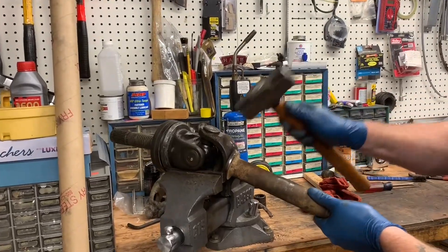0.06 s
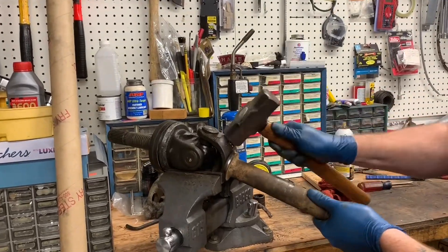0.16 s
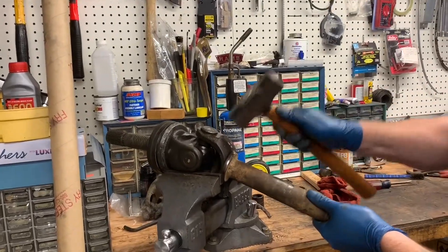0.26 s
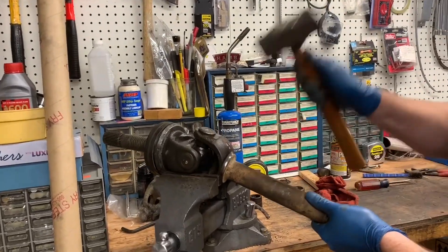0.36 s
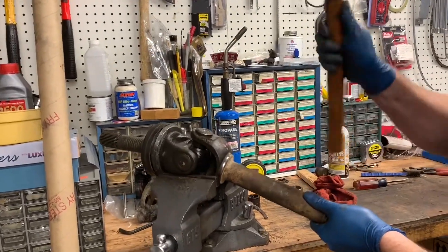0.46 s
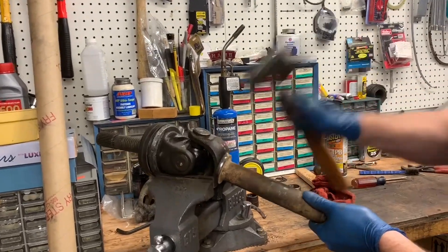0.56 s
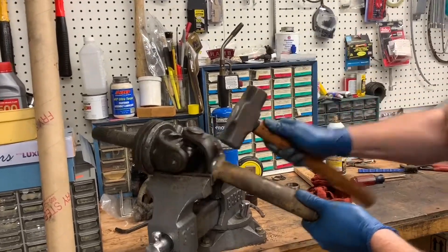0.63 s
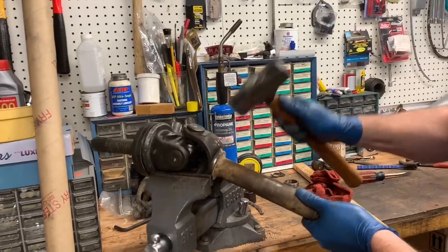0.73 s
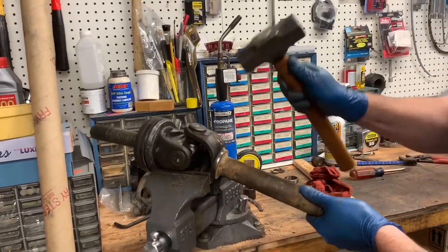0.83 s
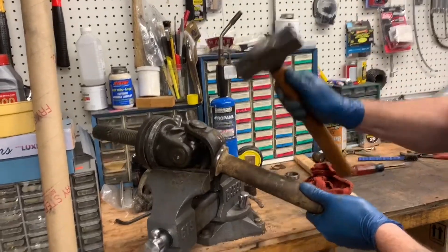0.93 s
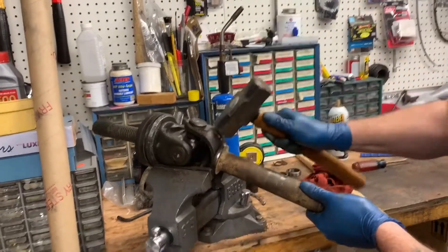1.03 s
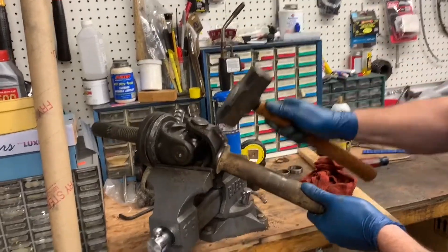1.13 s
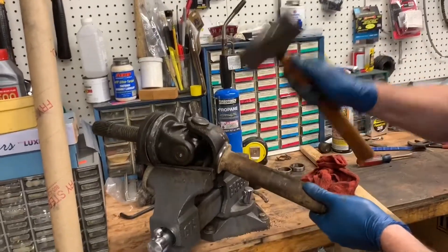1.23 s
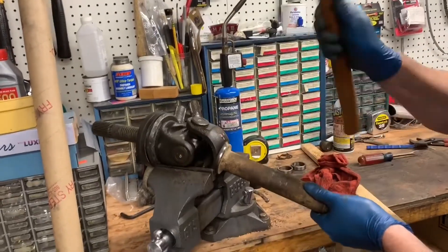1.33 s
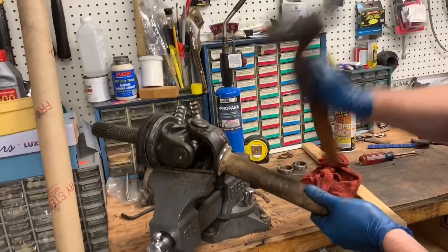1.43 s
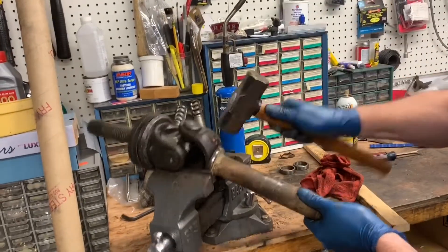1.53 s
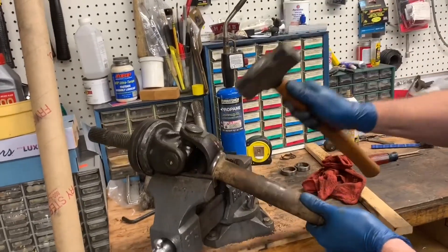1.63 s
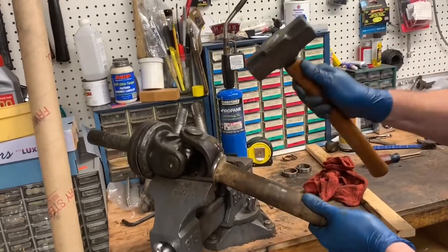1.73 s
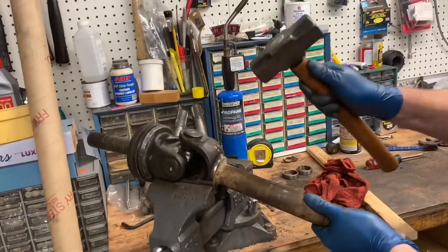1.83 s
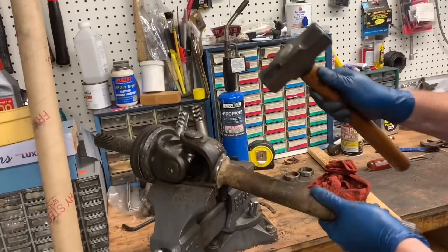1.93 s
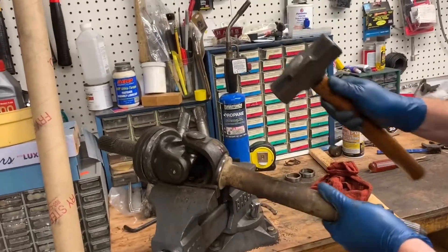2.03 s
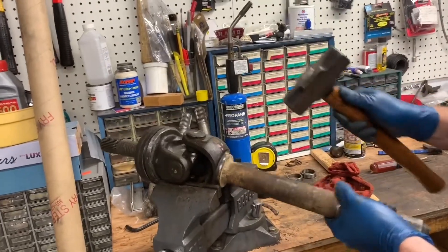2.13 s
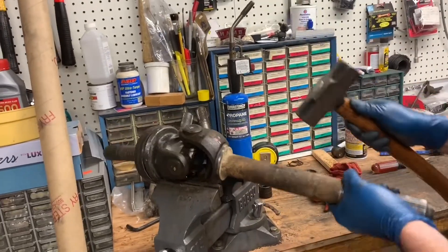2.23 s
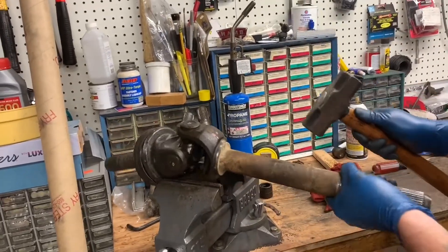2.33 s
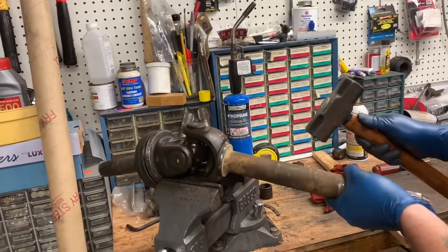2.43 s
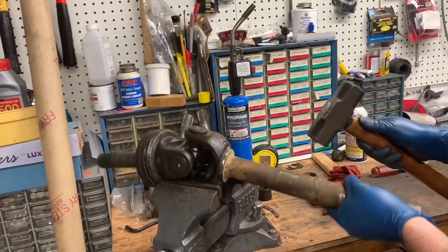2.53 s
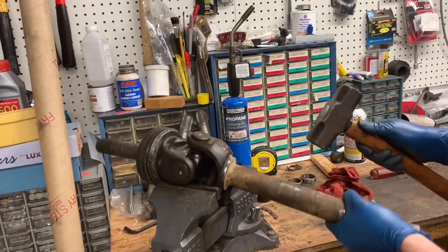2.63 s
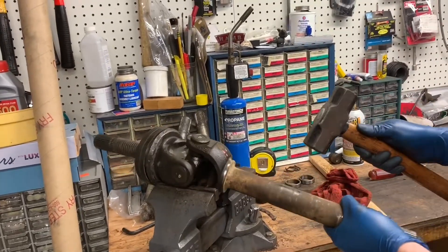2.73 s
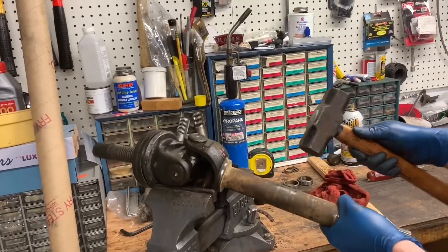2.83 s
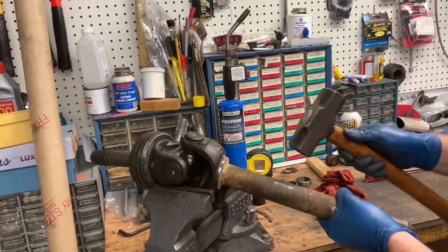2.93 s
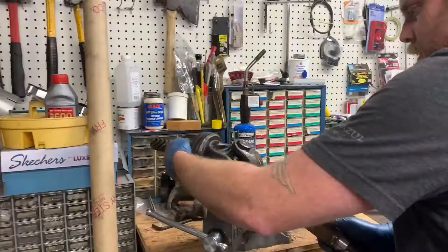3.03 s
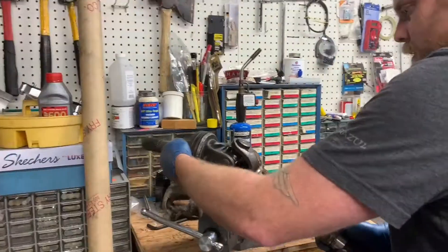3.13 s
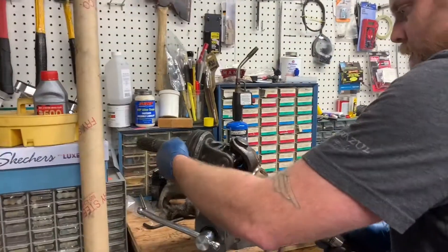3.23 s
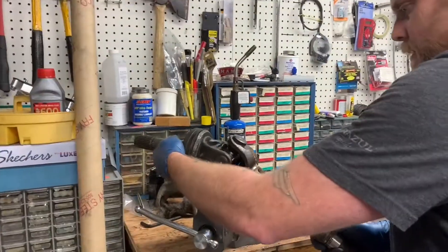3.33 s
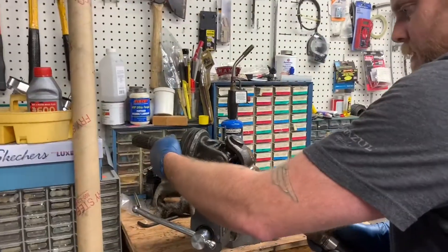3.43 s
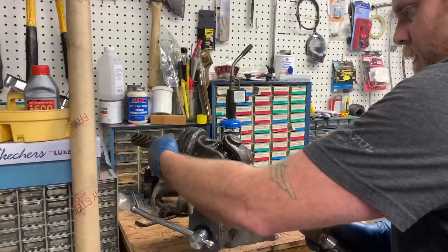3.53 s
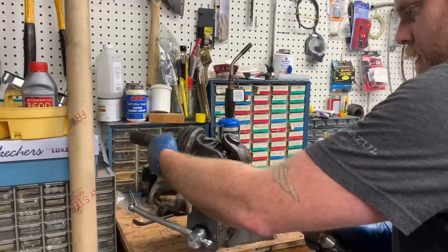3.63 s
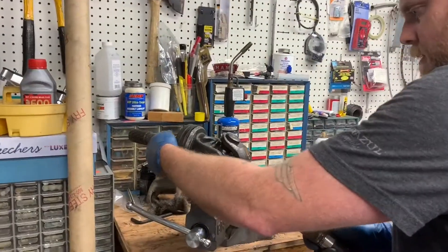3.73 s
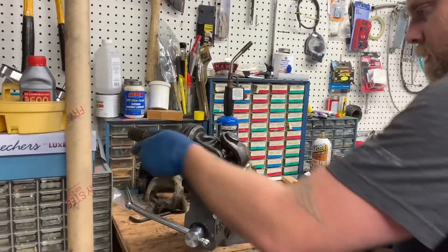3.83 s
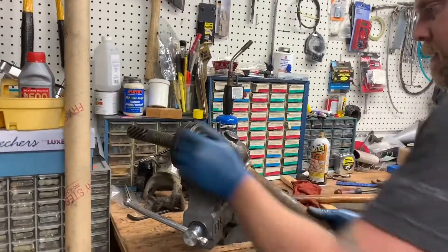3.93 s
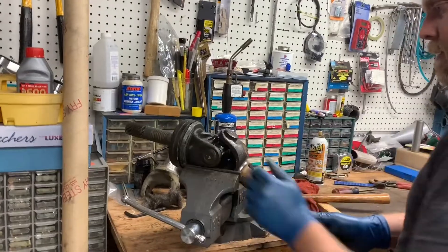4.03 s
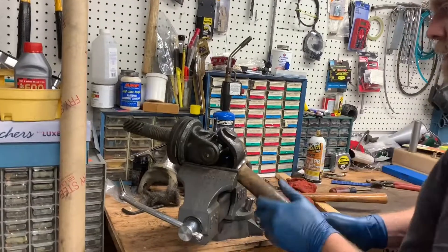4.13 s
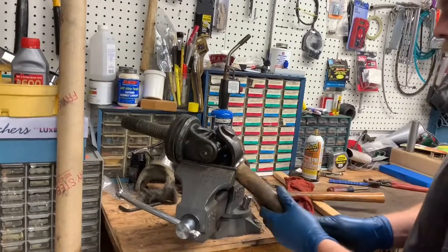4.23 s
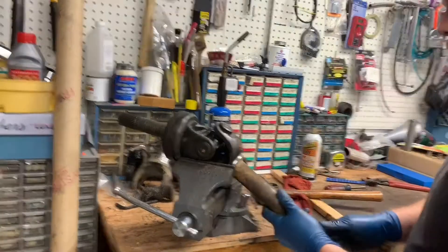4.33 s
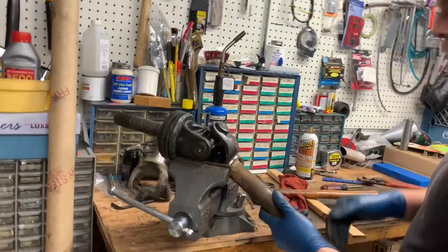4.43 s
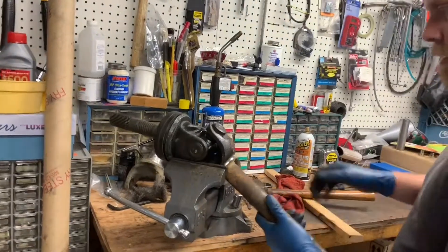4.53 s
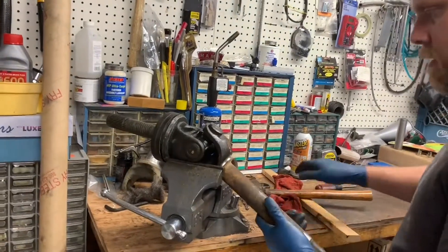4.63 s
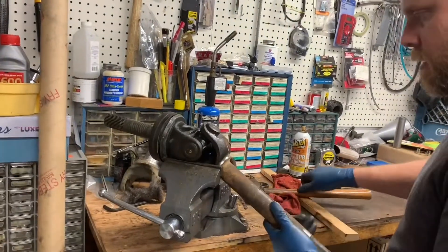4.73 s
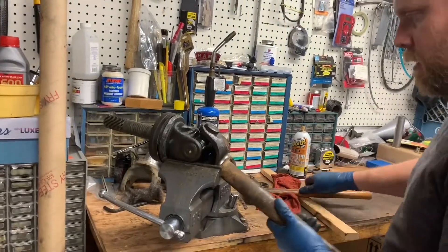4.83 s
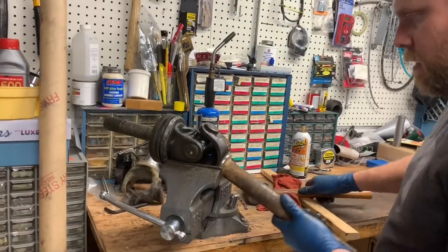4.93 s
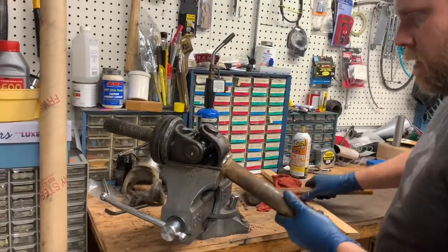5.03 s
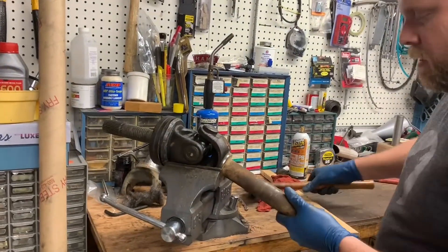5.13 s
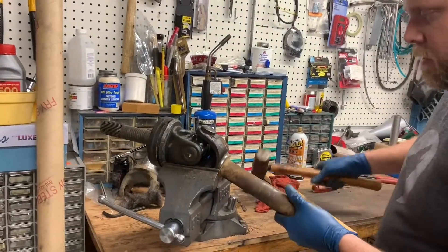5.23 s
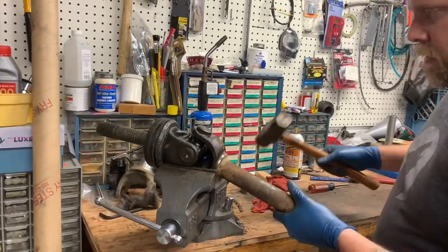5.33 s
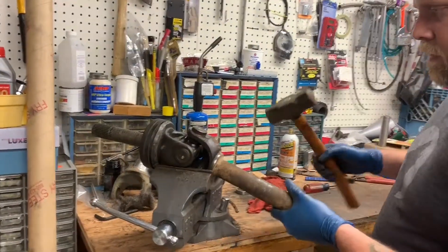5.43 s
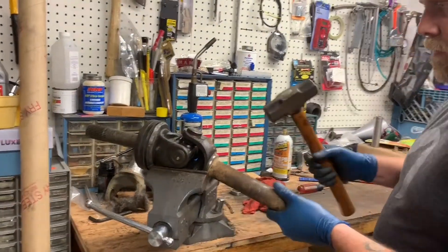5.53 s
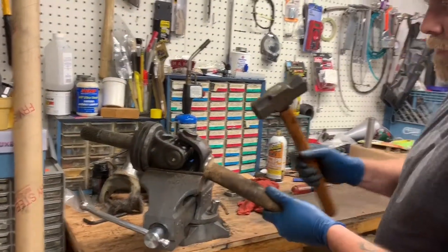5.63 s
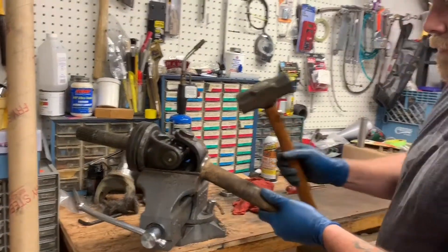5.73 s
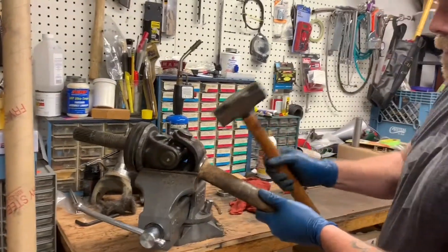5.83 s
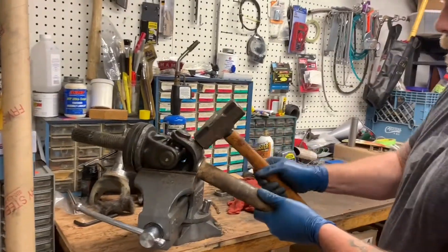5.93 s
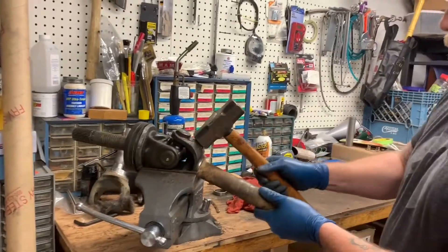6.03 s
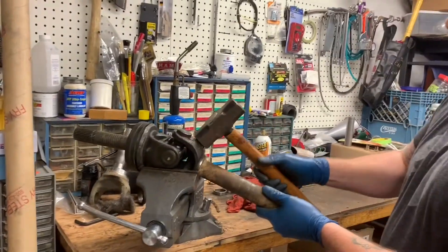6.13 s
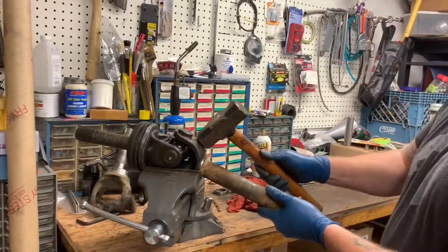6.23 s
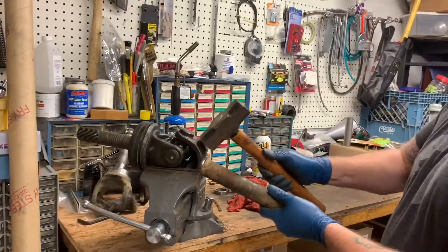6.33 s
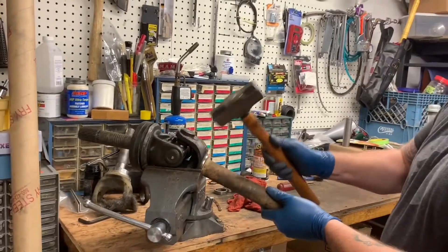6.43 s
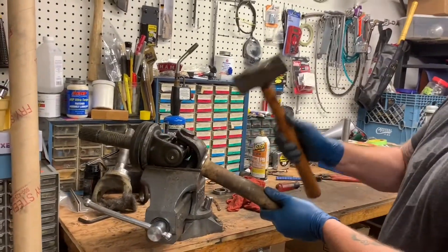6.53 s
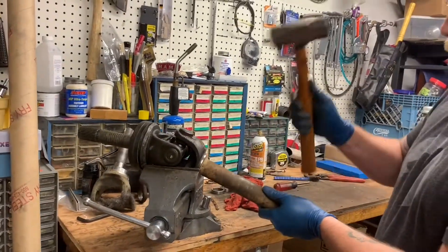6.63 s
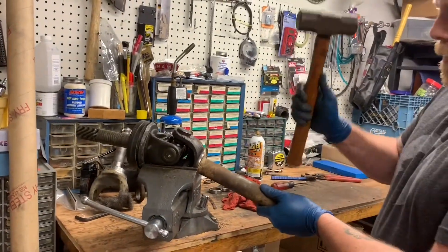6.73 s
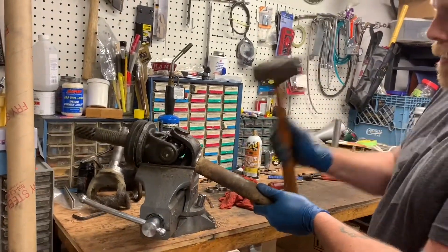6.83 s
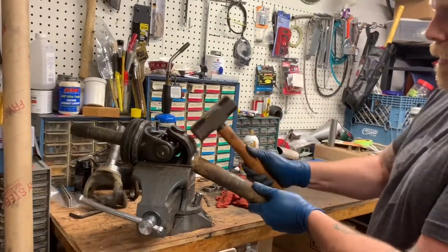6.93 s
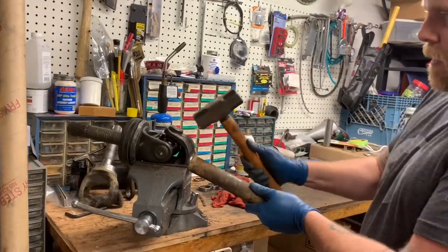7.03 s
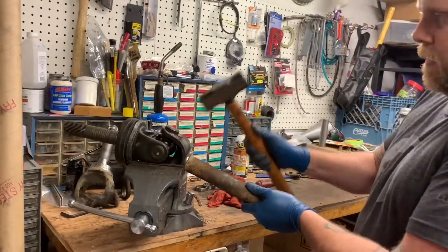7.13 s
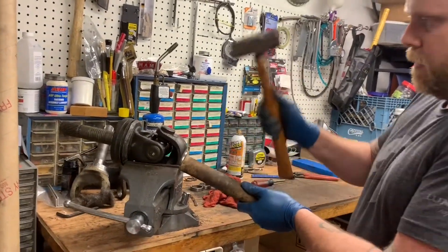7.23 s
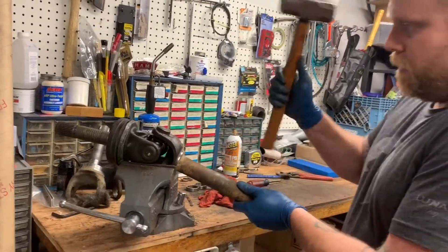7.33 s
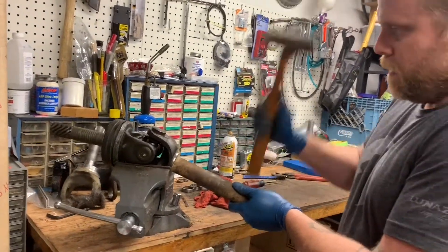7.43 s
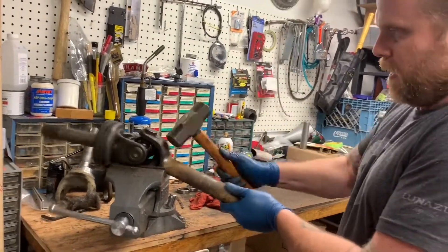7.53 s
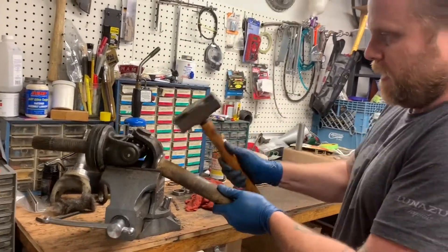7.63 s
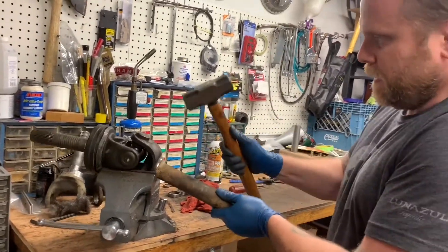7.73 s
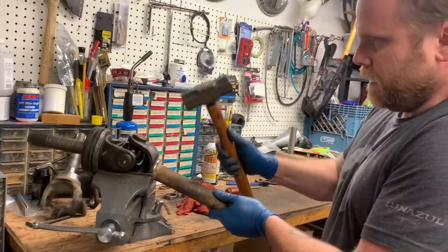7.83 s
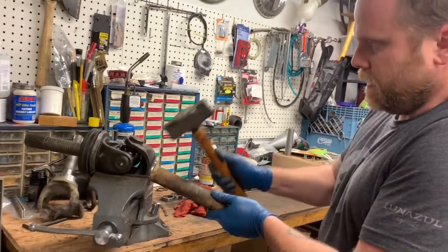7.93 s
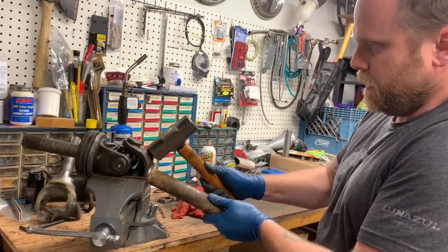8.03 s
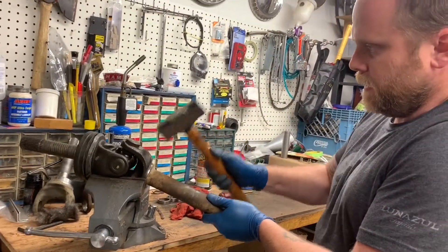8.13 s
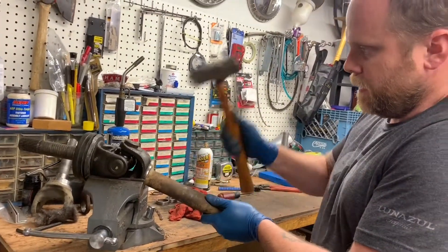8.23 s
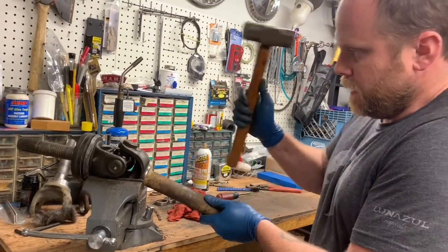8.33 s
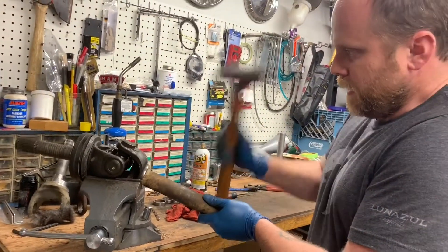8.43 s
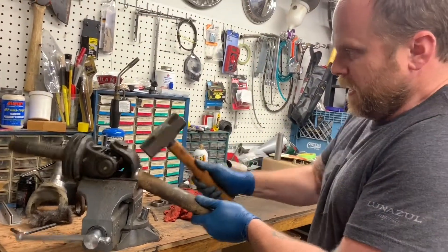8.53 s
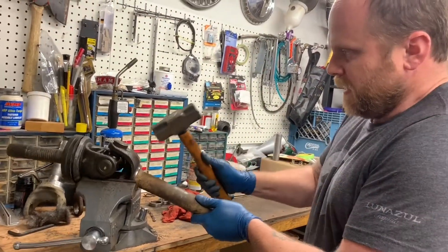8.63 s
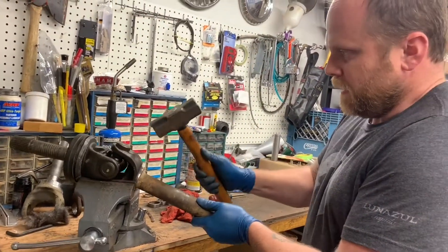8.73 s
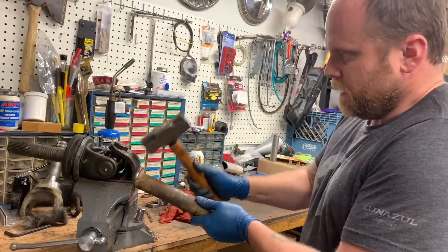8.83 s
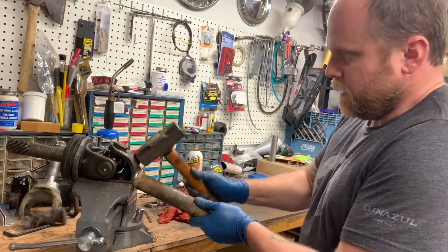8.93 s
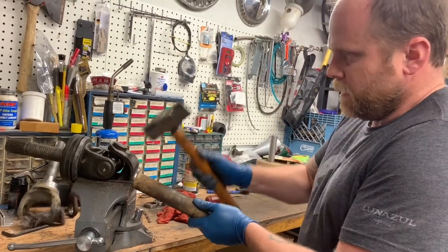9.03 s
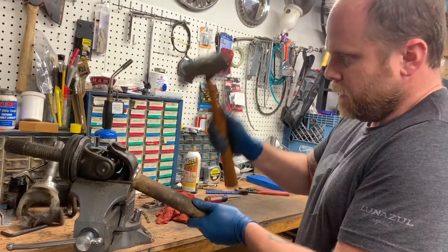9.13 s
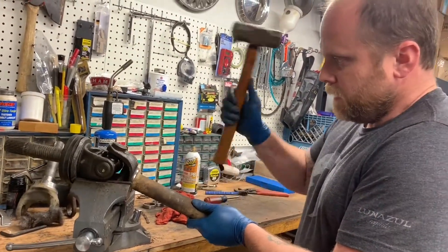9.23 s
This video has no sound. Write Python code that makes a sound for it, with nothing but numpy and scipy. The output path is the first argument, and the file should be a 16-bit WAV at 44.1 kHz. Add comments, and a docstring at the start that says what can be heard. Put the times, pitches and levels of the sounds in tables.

```python
"""A small sledgehammer beats on the joint of a steel axle shaft clamped in a bench vise, in a small workshop.
Each blow is a decaying noise burst with damped modes of vise, shaft, hammer head, tube and wooden bench.
Loose parts answer: a bearing cap chinks as damped modes, and small things rattle as swelling noise.
Between two rounds the hammer is put down, a gloved hand slides along the shaft (modulated noise),
and the joint is turned over with clacks, creaks and ticks, above low room noise with dull scuffs."""
import sys
import numpy as np
from scipy import signal
from scipy.fft import rfft, irfft
from scipy.io import wavfile
from scipy.ndimage import uniform_filter1d

SR = 44100
rng = np.random.default_rng(int(sys.argv[2]) if len(sys.argv) > 2 else 0)


def store_pcm(level_fs):
    """Save levels as 16-bit WAV."""
    pcm = np.round(np.clip(level_fs, -1, 1) * 32767).astype(np.int16)
    wavfile.write(sys.argv[1], SR, np.atleast_2d(pcm).T)


N = 408807
AGE = np.arange(SR) / SR  # time since a hit [s]


def amp(db):
    """Level: 20 dB is a factor of ten in amplitude."""
    return 10 ** (np.asarray(db) / 20)


def evened(x):
    """Normalization: scales a signal to unit root mean square."""
    return x / np.sqrt(np.mean(x ** 2) + 1e-20)


def read(points, hz, axis=1):
    """Logarithmic interpolation: reads a column of a spectrum table at the given frequencies."""
    table = np.array(points, float)
    return np.interp(np.log(hz + 1), np.log(table[:, 0] + 1), table[:, axis])


def panned(db):
    """Level difference: half is added on the left and half taken off on the right."""
    return amp(np.array([[.5], [-.5]]) * db)


def add(mix, s, sound):
    """Superposition: mixes a sound in at time s; whatever falls outside the scene is dropped."""
    start = round(s * SR)
    sound = sound[:, max(-start, 0):]
    part = mix[:, max(start, 0):][:, :sound.shape[1]]
    part += sound[:, :part.shape[1]]


def drift(size, hz):
    """Random modulation: low-passed noise of unit size, separate for each microphone."""
    f = np.fft.rfftfreq(size, 1 / SR)
    lowpass = 1 / (1 + (f / hz) ** 2) ** 2
    return evened(irfft(rfft(rng.standard_normal((2, size))) * lowpass, size))


def swell(t, width):
    """Smooth envelope: a rise and fall around t = 0."""
    return 1 / (1 + (t / width) ** 2 / 2) ** 2


def crowd(spectrum, ripple_db=5.0, spacing_hz=45):
    """Modal overlap: many crowded resonances leave peaks and notches all over a spectrum."""
    hz = np.arange(0, SR / 2, 8.)
    lag = np.fft.rfftfreq(len(hz), 8.)
    smoothing = np.exp(-(lag * spacing_hz) ** 2)
    ripple = evened(irfft(rfft(rng.standard_normal(len(hz))) * smoothing, len(hz)))
    ripple = ripple * hz / (hz + 500)  # weaker in the bass
    return np.c_[hz, read(spectrum, hz) + ripple_db * ripple]


# coherence of the two microphones: (frequency [Hz], left-right likeness [1])
ALIKE = [(60, 0.94), (150, 0.86), (300, 0.86), (600, 0.49), (1300, 0.36), (3000, 0.15), (8000, 0.034),
         (12000, 0.45)]
# stereo balance: (frequency [Hz], left-right level difference [dB])
LEAN = [(60, 1.5), (500, 1), (1100, 2.5), (2200, 2), (4500, -2), (9000, 0), (15000, 1)]


def noise(spectrum, size, tilt_db=0):
    """Partial coherence: coloured noise at two microphones, most alike in the bass."""
    hz = np.fft.rfftfreq(size, 1 / SR)
    a, b = rfft(rng.standard_normal((2, size)))
    same = np.clip(read(ALIKE, hz), -1, 1)
    pair = np.array([a, same * a + np.sqrt(1 - same ** 2) * b])
    tilt = tilt_db * np.log2(hz / 1000 + 0.18)
    colour = amp(read(spectrum, hz) + tilt) * panned(read(LEAN, hz))
    return evened(irfft(colour * pair, size))


# decay of a hit: (frequency [Hz], crack over the body per unit of crack [factor],
# early t60 at damping 1 [s], late level before the common gain [dB], late t60 [s])
DECAY = [(60, .1, 0.82, -29, 2.2), (170, 0.41, 0.37, -27, 1.8), (400, 0.2, 0.32, -25.5, 1.1),
         (1200, 0.92, 0.23, -22.5, 0.79), (3070, 0.75, .27, -22.5, 0.67), (7540, 1, 0.26, -30.5, 1),
         (14900, 3.7, 0.3, -38.5, 0.38)]


def burst(spectrum, rise, tilt_db, damping=1.0, crack=1., crack_s=0.016, build_cycles=0.61, bounce_db=3.5):
    """Two-stage decay: a crack of tiny bounces, crowded modes dying fast, then the room's tail."""
    z, hz = rfft(noise(spectrum, SR, tilt_db)), np.fft.rfftfreq(SR, 1 / SR)
    centres, out = np.log([row[0] for row in DECAY]), np.zeros((2, SR))
    contact = crack * np.exp(-(AGE / crack_s) ** 4) * amp(bounce_db * drift(SR, 570)[0])
    for (f, over, early, late_db, late), pick in zip(DECAY, np.eye(len(DECAY))):
        band = irfft(z * np.interp(np.log(hz + 1), centres, pick), SR)
        body = amp(-60 * AGE * damping / early) * (1 + over * contact)
        tail = amp(late_db - 60 * AGE / late)
        onset = 1 - np.exp(-AGE / (rise + build_cycles / f))  # the bass builds up last
        out += band * np.hypot(body, tail) * onset
    return 0.79 * out


def ring(modes, rise, waver=0.22, waver_hz=25, scatter_db=-1.5, opposed=0):
    """Modal synthesis: damped modes; the spot struck varies their level, reflections make each waver."""
    out, steps = np.zeros((2, SR)), np.arange(256)
    for hz, db, t60 in modes:
        # complex values waver in level and phase together
        a, b = uniform_filter1d(rng.standard_normal((2, 256, 2)) @ [1, 1j], size=2)
        same = np.clip(read(ALIKE, hz) - opposed, -1, 1)  # opposed: moves the microphones out of phase
        apart = np.arccos(same) * rng.choice([-1, 1])
        left = 1 + waver * a
        right = np.exp(1j * apart) + waver * (same * a + np.sqrt(1 - same ** 2) * b)
        t = AGE[:int(1.4 * SR * t60)]
        decay = amp(db + scatter_db * rng.standard_normal() - 60 * t / t60)
        tone = decay * np.exp(2j * np.pi * (hz * t + rng.random()))
        sway = np.array([np.interp(t * waver_hz, steps, side) for side in (left, right)])
        add(out, 0, (tone * sway).real * panned(read(LEAN, hz)))
    return out * (1 - np.exp(-AGE / rise))


ROOM_DB = -70.5  # steady noise of the room
# room noise: (frequency [Hz], relative spectral level [dB])
ROOM = [(25, -6.5), (60, 8.5), (130, 3.5), (300, -1), (500, -9.5), (800, -11.5), (1200, -10), (2200, -21),
        (5000, -31.5), (9000, -39.5), (15000, -47)]
# scuffs as the worker shifts at the bench: (time [s], level [dB], swell width [s])
SCUFFS = [(0.0, -55.5, 0.19), (1.9, -59, 0.22), (2.65, -59.5, 0.086), (3.3, -63, .08), (3.5, -68, 0.077),
          (4.68, -53, 0.044), (5.03, -51, 0.085), (5.68, -66.5, 0.15), (6.17, -62, .12),
          (6.66, -56.5, 0.16), (7.3, -59, 0.068)]


def workshop(lumps_db=0.5):
    """Power addition: low room noise swells into dull scuffs as the worker shifts about."""
    t = np.arange(N) / SR
    power = amp(ROOM_DB) ** 2 + sum((amp(db) * swell(t - s, width)) ** 2 for s, db, width in SCUFFS)
    lumps = amp(lumps_db * drift(2 ** 19, 14)[0, :N])
    return np.sqrt(power) * lumps * noise(crowd(ROOM, ripple_db=4.5), 2 ** 19)[:, :N]


# vise modes: (frequency [Hz], relative level [dB], t60 [s])
VISE = [(1035, -10, .22), (1130, -7, .27), (1222, -7, .25), (1416, -7, .23), (1529, -8, .25),
        (1740, -13, .2), (1918, -11, .22), (2143, -11, .2), (2360, -10, .23), (2864, -15, .32),
        (3790, -12, .23)]


def vise_clang(rise):
    """Modal ringing: the struck vise clangs in strongly wavering modes."""
    return ring(VISE, rise, waver=1.0, waver_hz=92.5)


# shaft modes before the early surge: (frequency [Hz], relative level [dB], t60 [s])
SHAFT = [(4228, -6, .33), (4256, -1, .27), (4294, -4, .21), (4410, -10, .14), (5120, -10, .17),
         (5190, -7, .24), (5645, -11, .26), (8740, -22, .18), (9290, -29, .3), (10121, -11, .19),
         (12330, -21, .13), (14030, -26, .08)]
SHAFT_SURGE, SHAFT_SURGE_S = 0.95, 0.09  # extra amplitude [factor], its time constant [s]


def shaft_ring(rise):
    """Added damping: the shaft's modes ring hardest until the hand damps them."""
    surge = 1 + SHAFT_SURGE * np.exp(-AGE / SHAFT_SURGE_S)
    return ring(SHAFT, rise, waver=1.0, waver_hz=96) * surge


# hammer head modes: (frequency [Hz], relative level [dB], t60 [s])
HAMMER = [(11568, 0, .72), (11576, -7, .45)]


def hammer_ring(rise):
    """Beating: two close modes of the hammer head, shifted in phase between the microphones."""
    return ring(HAMMER, rise, waver=1.0, waver_hz=49.4, scatter_db=2.0, opposed=0.62)


# tube modes: (frequency [Hz], relative level [dB], t60 [s])
TUBE = [(1160, 0, 1.4), (1190, -4, 1.2), (1405, -7, 1.3), (2826, -10, 1.4), (3365, -17, 1.3),
        (3994, -9, 1.4)]


def tube_ring(rise, **wavering):
    """Light damping: the tube's modes ring on for more than a second."""
    return ring(TUBE, rise, **wavering)


# wooden bench modes: (frequency [Hz], relative level [dB], t60 [s])
BENCH = [(57.4, -16.5, 0.39), (108, -10.5, 0.16), (150, -7, 0.35), (194, -8, 0.27), (231.3, -12, 0.37),
         (289.4, 3, 0.12), (338, 0.5, 0.12), (410, -11, 0.12), (526, -1, 0.13), (629, -13, 0.15)]
THUMP_RISE_S = .004


def thump():
    """Low-frequency resonance: the wooden bench booms."""
    return ring(BENCH, THUMP_RISE_S, waver=0.54, waver_hz=60.7, scatter_db=1.5)


# hammer blows: (time [s], clank level [dB], rise time constant [s], treble tilt [dB/octave],
# vise clang [dB], shaft ring [dB], hammer ring [dB], tube ring [dB], first cap chink [dB], rattle [dB])
BLOWS = [(0.0658, -14, 0.00047, -1.9, -30, -23.5, -32.5, -55.5, -58, -56.5),
         (0.5189, -13.5, .005, 1, -24, -33, -32.5, -67, -25, -43.5),
         (0.945, -17.5, 0.0016, 0.54, -31.5, -23.5, -46.5, -57.5, -32, -62),
         (1.405, -12.5, 0.0054, -0.5, -21, -30, -55.5, -53.5, -20, -61),
         (5.841, -14.5, .0008, -2.45, -19.5, -21, -32, -81.5, -54, -59.5),
         (6.848, -13.5, 0.0037, 0, -28.5, -27, -33, -60, -23, -42.5),
         (7.445, -13, 0.0064, 1.7, -23, -26, -56.5, -56, -29, -43.5),
         (7.941, -22.5, 0.00052, -1.45, -43.5, -28.5, -44.5, -76, -37, -70.5),
         (8.43, -14, 0.0028, 1.5, -22, -25.5, -55, -73.5, -24, -46.5),
         (8.812, -25, 0.0019, -2.5, -34, -30, -55, -71, -56, -79)]
# crowded, quickly damped modes of joint and vise: (frequency [Hz], relative spectral level [dB])
CLANK = [(40, -22), (130, -3), (320, 3.5), (520, 1), (780, -4), (1200, 3), (1900, -4), (2400, -1),
         (3200, -5), (4500, -3), (6500, -10), (7800, -15.5), (8700, -23), (12200, -17.5), (14000, -35.5)]
# the thump grows more slowly than the blow: level for a 0 dB blow [dB], growth [dB/dB]
THUMP_DB, THUMP_GROWTH = -12, .55
THUMP_LAG_S = .007  # delay through the vise


def hammering():
    """Impact excitation: steel meets steel, and the push reaches the bench through the vise a moment later."""
    out, joint = np.zeros((2, N)), crowd(CLANK, ripple_db=2.5, spacing_hz=42.2)
    for s, db, rise, tilt_db, vise_db, shaft_db, hammer_db, tube_db, _, _ in BLOWS:
        # each blow lands on a slightly different spot
        spot = crowd(joint, ripple_db=0.5, spacing_hz=111.4)
        steel = amp(db) * burst(spot, rise, tilt_db, crack=1.3, crack_s=.013)
        steel += amp(vise_db) * vise_clang(rise)
        steel += amp(shaft_db) * shaft_ring(rise)
        steel += amp(hammer_db) * hammer_ring(rise)
        steel += amp(tube_db) * tube_ring(rise, waver=0.64, waver_hz=29.6)
        add(out, s, steel)
        add(out, s + THUMP_LAG_S, amp(THUMP_DB + THUMP_GROWTH * db) * thump())
    return out


# bearing cap modes before any pinch: (frequency [Hz], relative level [dB], t60 [s])
CAP = [(6686, -19, .22), (7380, -8, .27), (7425, -15, .3), (7720, -10, .24), (8005, -20, .22),
       (11922, -2, .38), (11985, -12, .2), (12060, -12, .18), (12610, -17, .22)]


def chink():
    """Secondary impact: the bearing cap strikes its bore and rings in its modes."""
    return ring(CAP, .003, waver=.7, waver_hz=70, scatter_db=2.5)


# rattling things: (frequency [Hz], relative spectral level [dB])
RATTLE = [(40, -10), (120, 2.5), (350, -1.5), (700, -6), (950, -2), (1180, -1), (1500, -13.5),
          (3000, -18.5), (6000, -26), (9000, -44.5), (15000, -60.5)]


def chatter(tilt_db, swell_s, grain_db=1.5, grain_hz=70):
    """Amplitude modulation: grainy noise of small things rattling, strongest halfway through one second."""
    grain = amp(grain_db * drift(SR, grain_hz)[0])
    return evened(noise(crowd(RATTLE), SR, tilt_db) * grain) * swell(AGE - .5, swell_s)


# the loosened joint drops back: (time [s], cap chink [dB], clatter [dB], clatter tilt [dB/octave])
REBOUNDS = [(0.598, -26, -31.5, .5), (1.46, -21.5, -41, 2), (1.511, -23, -30, 0.3), (7.68, -58.5, -47.5, 7)]
CLATTER_LAG_S, CLATTER_SWELL_S = 0.0036, 0.011
# things on the shaken bench chatter most a moment after the blow; tilt per octave
RATTLE_LAG_S, RATTLE_SWELL_S, RATTLE_TILT_DB = .265, 0.13, -1.8
# the cap chinks just after a blow and hops once, more softly; pinched by the blow, it dies faster
CAP_LAG_S, HOP_S, HOP_DB, PINCH_DB_PER_S = .005, 0.016, -5, 119.5


def loose_parts():
    """Delayed response: each blow makes the cap chink and hop and shakes the bench; the joint may drop back."""
    out, pinch = np.zeros((2, N)), amp(-PINCH_DB_PER_S * AGE)
    for s, *_, cap_db, rattle_db in BLOWS:
        add(out, s + CAP_LAG_S, amp(cap_db) * pinch * chink())
        add(out, s + CAP_LAG_S + HOP_S, amp(cap_db + HOP_DB) * pinch * chink())
        # chatter peaks half a second into its own sound
        add(out, s + RATTLE_LAG_S - .5, amp(rattle_db) * chatter(RATTLE_TILT_DB, RATTLE_SWELL_S))
    for s, cap_db, clatter_db, tilt_db in REBOUNDS:
        add(out, s, amp(cap_db) * chink())
        add(out, s + CLATTER_LAG_S - .5, amp(clatter_db) * chatter(tilt_db, CLATTER_SWELL_S))
    return out


# tools and shaft put down or shifted: (time [s], level [dB], rise time constant [s], tilt [dB/octave])
KNOCKS = [(2.348, -20, 0.0025, -0.1), (2.715, -49.5, 0.00094, -3.5), (3.02, -34, 0.028, -3),
          (3.106, -27.5, 0.00084, -2), (4.98, -44, 0.0055, -9)]
# knock colour: (frequency [Hz], relative spectral level [dB])
KNOCK = [(40, -22), (130, -4.5), (230, -2), (370, 2.5), (480, -9), (700, -14.5), (1100, -16.5), (2300, -29),
         (4500, -39.5), (8000, -53), (15000, -54)]
# bench, and tube at zero tilt, relative to the knock
KNOCK_THUMP_DB, KNOCK_TUBE_DB = -13.5, -41.5
TUBE_DB_PER_TILT_DB = 9  # a soft, dull knock hardly rings the tube
# the joint swings against its stops: (time [s], level [dB], tilt [dB/octave])
CLACKS = [(4.382, -32, -2.5), (4.735, -31, -2.5), (4.746, -31.5, -0.5), (5.22, -35.5, -2.5)]
# clack and tick colour: (frequency [Hz], relative spectral level [dB])
CLACK = [(60, -25.5), (280, -10), (470, 0), (650, -6.5), (900, -8.5), (1500, -12), (2400, -17.5),
         (4500, -21.5), (8000, -28.5), (15000, -31.5)]
# the joint creaks briefly as it turns: (time [s], level [dB])
CREAKS = [(4.232, -47.5), (4.652, -50.5)]
# creak modes: (frequency [Hz], relative level [dB], t60 [s])
CREAK = [(414, -12, .16), (482, 2, 0.16), (585, -3, 0.11), (973, -2, 0.065)]
# tiny metal ticks: (time [s], level [dB])
TICKS = [(1.908, -55.5), (1.974, -63), (4.996, -54.5), (5.483, -58.5)]


def handling():
    """Impact damping: dull knocks on the bench, clacks and creaks of the joint, and light ticks die at own rates."""
    out = np.zeros((2, N))
    for s, db, rise, tilt_db in KNOCKS:
        knock = burst(crowd(KNOCK, ripple_db=3), rise, tilt_db, damping=1.51, crack=0.19)
        knock += amp(KNOCK_TUBE_DB + TUBE_DB_PER_TILT_DB * tilt_db) * tube_ring(rise)
        add(out, s, amp(db) * knock)
        add(out, s + rise, amp(db + KNOCK_THUMP_DB) * thump())
    for s, db, tilt_db in CLACKS:
        add(out, s, amp(db) * burst(crowd(CLACK), 0.0031, tilt_db, damping=1.22, crack=0.043))
    for s, db in CREAKS:
        add(out, s, amp(db) * ring(CREAK, 0.0043, waver=0.68, waver_hz=80))
    for s, db in TICKS:
        add(out, s, amp(db) * burst(CLACK, 0.0004, 2.6, damping=3.4, crack=0.63, crack_s=0.0054))
    return out


# a glove slides on steel or on the hammer's handle: (start [s], length [s], held level [dB])
STROKES = [(3.698, 0.014, -72), (3.953, .015, -77), (4.123, 0.18, -57), (4.591, 0.038, -60),
           (5.03, 0.031, -61), (5.316, 0.029, -67), (5.52, 0.75, -82.5)]
STROKE_RISE_DB_PER_S, STROKE_FALL_DB_PER_S = 265, 310


def sliding(t):
    """Exponential envelope: every stroke of the hand rises, holds and falls at the same rates."""
    total = 0
    for s, length, db in STROKES:
        rise_db = STROKE_RISE_DB_PER_S * np.clip(s - t, 0, 1)
        fall_db = STROKE_FALL_DB_PER_S * np.clip(t - s - length, 0, 1)
        total = total + amp(db - rise_db - fall_db)
    return total


# rubber on steel: (frequency [Hz], relative spectral level [dB])
GLOVE = [(200, -7.5), (900, -12), (2500, -6.5), (6000, -3.5), (8500, -12), (11000, 1), (13500, -18.5),
         (15000, -1), (16500, -23)]


def glove(grain_db=1.6, grain_hz=160, grip_db=-3, grip_s=0.031):
    """Stick-slip friction: rubber slips in tiny jerks, a thin hiss and then a duller rub as the hand closes."""
    t = np.arange(N) / SR
    touch = sliding(t) * noise(GLOVE, 2 ** 19)[:, :N]
    grip = amp(grip_db) * sliding(t - grip_s) * noise(GLOVE, 2 ** 19, tilt_db=-2.0)[:, :N]
    jerks = amp(grain_db * drift(2 ** 19, grain_hz)[0, :N])
    return (touch + grip) * jerks


def scene():
    """Superposition: all sources sound together."""
    return workshop() + hammering() + loose_parts() + handling() + glove()


EDGE_HZ = 16300  # upper band limit


def record(dry, ceiling=1.0):
    """Saturation and low-pass filtering: the loudest peaks are rounded off, then the band is limited."""
    rounded = ceiling * np.tanh(dry / ceiling)
    lowpass = signal.firwin(301, EDGE_HZ, window=("kaiser", 8), fs=SR)
    return signal.oaconvolve(rounded, lowpass[None], "same")


dry = scene()
out = record(dry)
store_pcm(out)
```